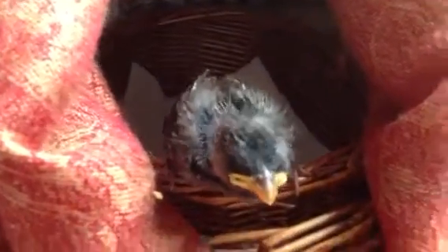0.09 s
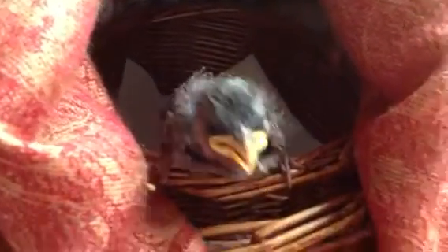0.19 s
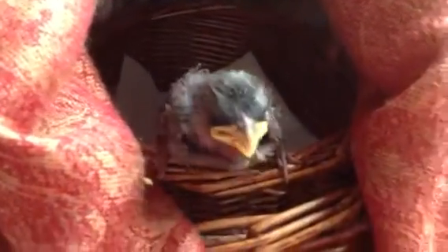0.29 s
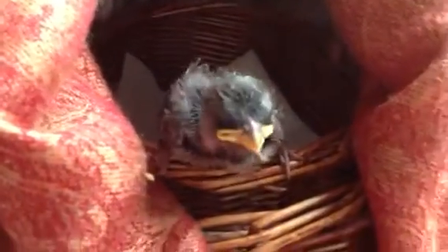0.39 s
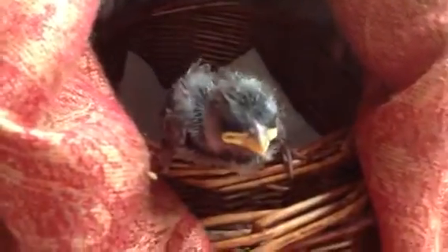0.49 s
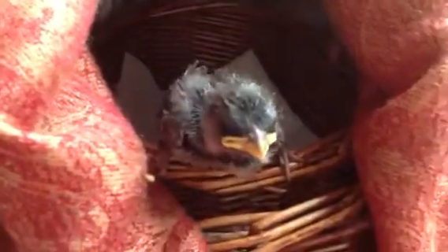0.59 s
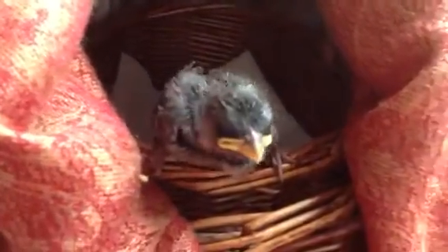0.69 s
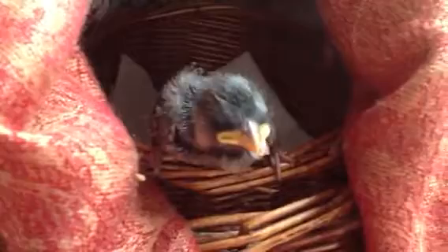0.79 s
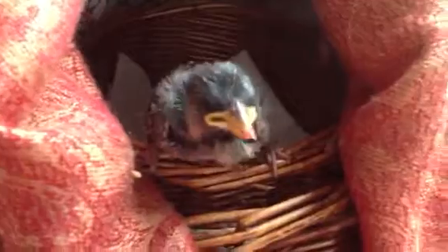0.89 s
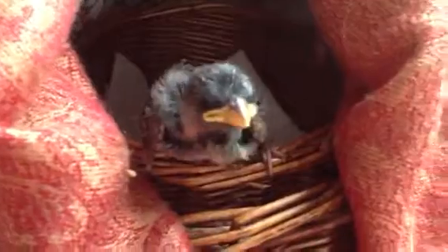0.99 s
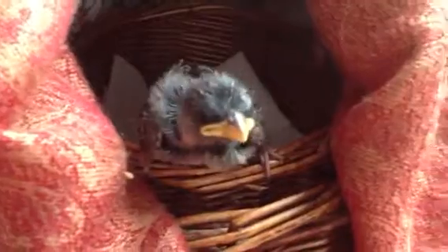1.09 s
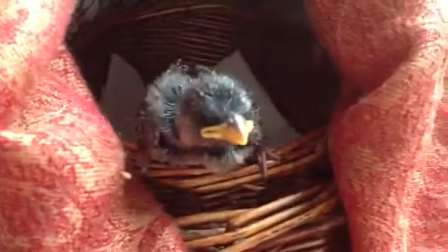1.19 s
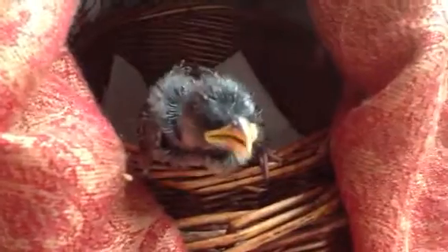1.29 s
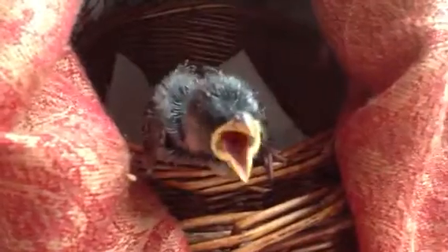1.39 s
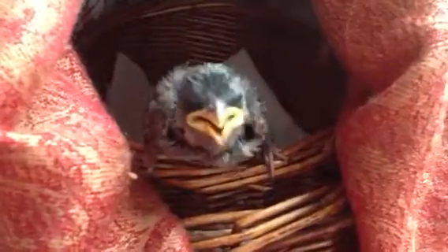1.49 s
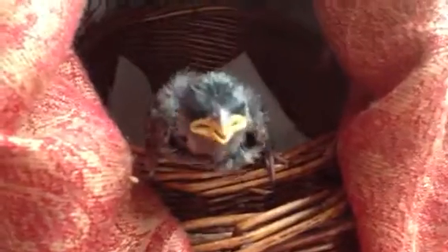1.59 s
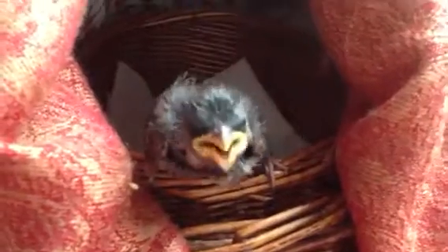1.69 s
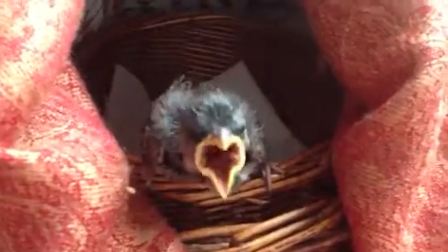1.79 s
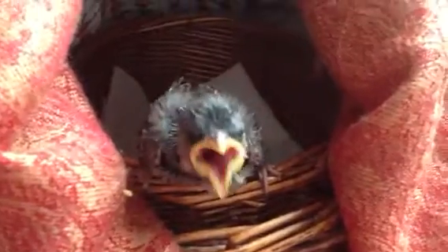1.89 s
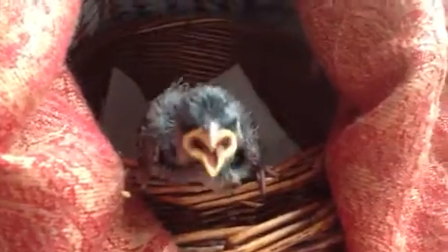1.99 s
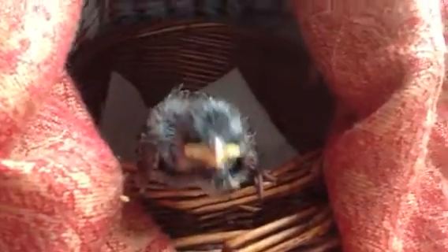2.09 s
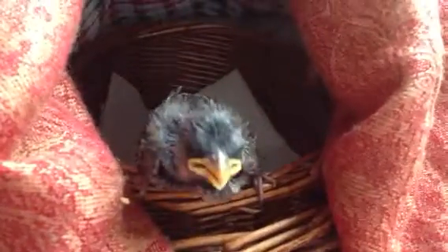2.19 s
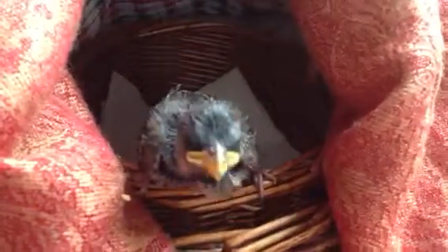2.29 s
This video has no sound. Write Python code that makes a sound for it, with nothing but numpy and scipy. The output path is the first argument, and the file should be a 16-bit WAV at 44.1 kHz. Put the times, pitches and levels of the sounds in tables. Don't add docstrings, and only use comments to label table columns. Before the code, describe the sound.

Two piercing double chirps from a baby bird, one near the start and one after a pause, raspy around clear whistles; tiny wicker ticks, very faint far birds and low room hush, recorded close indoors.

```python
import sys
import numpy as np
from scipy import signal
from scipy.fft import rfft, irfft
from scipy.io import wavfile
from scipy.ndimage import uniform_filter1d

SR = 44100
rng = np.random.default_rng(int(sys.argv[2]) if len(sys.argv) > 2 else 0)


def convert_level_to_amplitude(level_db):
    exponent = np.asarray(level_db, float) / 20
    return 10 ** exponent


def file_out(sig):
    cols = np.atleast_2d(sig).T
    lim = np.clip(cols, -1, 1)
    pcm = np.round(lim * 32767).astype(np.int16)
    wavfile.write(sys.argv[1], SR, pcm)


N = 101430


def rms_one(x):
    return x / np.sqrt(np.mean(x ** 2) + 1e-20)


def clock():
    return np.arange(N) / SR


def at_hz(points, hz):
    table_hz, table_db = np.transpose(points)
    return np.interp(np.log(hz), np.log(table_hz), table_db)


def drift(rate_hz):
    r = np.exp(-2 * np.pi * rate_hz / SR)
    noise = rng.standard_normal(N + SR)
    return rms_one(signal.lfilter([1], [1, -2 * r, r * r], noise)[SR:])


def window(start, end, edge_s=.002):
    t = clock()
    return np.clip(np.minimum(t - start, end - t) / edge_s, 0, 1)


def resonance(x, hz, width_hz):
    r = np.exp(-np.pi * width_hz / SR)
    gain = (1 - r * r) / 2
    return signal.lfilter([gain, 0, -gain], [1, -2 * r * np.cos(2 * np.pi * hz / SR), r * r], x)


def double_resonance(x, hz, width_hz):
    return resonance(resonance(x, hz, width_hz), hz, width_hz)


def moving_resonance(x, hz, width_hz):
    turn = np.exp(2j * np.pi * np.cumsum(hz) / SR)
    low_pass = signal.butter(1, width_hz / 2, fs=SR, output="sos")
    return 2 * np.real(turn * signal.sosfilt(low_pass, x / turn))


def glides(rows, wobble_db):
    out, t = np.zeros(N), clock()
    waver = 1 + .012 * drift(400)
    for s, length, start_hz, end_hz, db in rows:
        hz = np.interp(t, [s, s + length], [start_hz, end_hz]) * waver
        phase = 2 * np.pi * np.cumsum(hz) / SR
        tone = np.sin(phase) + convert_level_to_amplitude(-29.5) * np.sin(2 * phase)
        out += np.sqrt(2) * convert_level_to_amplitude(db) * window(s, s + length, length / 8) * tone
    return out * convert_level_to_amplitude(wobble_db * drift(120))


# [t/s, f/Hz, level/dB]
FIRST_ARCH = [
    (.223, 4000, -20),
    (.228, 4100, -11.5),
    (.2355, 4330, -8),
    (.2375, 4750, -14),
    (.244, 5250, -10.5),
    (.2515, 5420, -6.5),
    (.277, 4980, -8.5),
    (.280, 4560, -10.5),
    (.292, 3850, -13),
]
# [t/s, f/Hz, level/dB]
FIRST_RISE = [
    (.338, 2600, -42),
    (.348, 2950, -33),
    (.352, 3200, -22),
    (.362, 3600, -17),
    (.368, 3880, -11.5),
    (.379, 4450, -9),
    (.387, 4560, -11),
    (.392, 3950, -18),
    (.400, 3500, -24),
]
# [t/s, f/Hz, level/dB]
SECOND_ARCH = [
    (1.488, 3700, -30),
    (1.505, 4400, -21),
    (1.516, 5100, -13),
    (1.528, 5200, -7),
    (1.539, 5080, -8),
    (1.549, 5290, -8.5),
    (1.551, 4760, -7),
    (1.559, 4280, -9),
    (1.568, 3800, -22),
]
# [t/s, f/Hz, level/dB]
SECOND_RISE = [
    (1.618, 2700, -44),
    (1.632, 3300, -33),
    (1.6355, 3500, -20),
    (1.649, 4120, -12.5),
    (1.656, 4500, -12),
    (1.667, 4400, -11),
    (1.672, 3950, -17),
    (1.68, 3650, -20),
    (1.686, 3500, -34),
]
# [t/s, length/s]
VOICE_BREAKS = [
    (.2405, .001),
    (.278, .0015),
    (1.5412, .0015),
    (1.55, .002),
]
# [start t/s, end t/s, level/dB under the whistle]
HALF_PITCH_SPELLS = [
    (.238, .27, -32),
    (.376, .39, -34),
    (1.51, 1.551, -29),
    (1.652, 1.67, -36),
]
# [multiple of the whistle pitch, level/dB]
HALF_PITCH_PARTIALS = [(.5, -7.), (1.5, -3.), (2.5, -2.)]
# [start t/s, end t/s]
FLUTTER_SPELLS = [
    (.3805, .41),
    (1.6505, 1.69),
]
# [t/s, depth 0-1]
AIRWAY_PINCHES = [(.3816, .6), (.3851, .75), (.3883, .85), (.3906, .85), (.3922, .6), (.3947, .7),
                  (.3965, .7), (.3989, .7), (1.6534, .65), (1.656, .25), (1.658, .55), (1.661, .85),
                  (1.6643, .85), (1.6684, .7), (1.671, .6), (1.6745, .5), (1.6768, .95), (1.681, .95)]
# [f/Hz, level/dB]
SECOND_PARTIAL = [(5000, 12), (6000, 2), (7100, -12), (7700, -37), (8300, -33), (8800, -22), (9600, -34),
                  (10400, -23.5)]
# [f/Hz, level/dB]
THIRD_PARTIAL = [(8000, -30), (10000, -19), (12000, -23), (13000, -25), (13800, -27), (15000, -21),
                 (15400, -30), (16000, -50)]


def whistle():
    t, out, strength = clock(), np.zeros(N), np.zeros(N)
    shape = convert_level_to_amplitude(.5 * drift(180))
    half = sum(convert_level_to_amplitude(db) * window(a, b) for a, b, db in HALF_PITCH_SPELLS) * convert_level_to_amplitude(drift(160))
    for s, length in VOICE_BREAKS:
        shape = shape * np.tanh((s - t) / length * 2)
    pinch_s = .0007
    for s, depth in AIRWAY_PINCHES:
        shape = shape * (1 - depth * np.exp(-.5 * ((t - s) / pinch_s) ** 2))
    dull = convert_level_to_amplitude(-3 * sum(window(a, b) for a, b in FLUTTER_SPELLS))
    second = dull * convert_level_to_amplitude(1.5 * drift(100))
    third = dull * convert_level_to_amplitude(1.5 * drift(100))
    for note in (FIRST_ARCH, FIRST_RISE, SECOND_ARCH, SECOND_RISE):
        s, hz, db = np.transpose(note)
        hz = np.interp(t, s, hz) * (1 + .005 * drift(400))
        level = convert_level_to_amplitude(np.interp(t, s, db)) * window(s[0], s[-1])
        phase = 2 * np.pi * np.cumsum(hz) / SR
        tone = np.sin(phase)
        tone += second * convert_level_to_amplitude(at_hz(SECOND_PARTIAL, 2 * hz)) * np.sin(2 * phase)
        tone += third * convert_level_to_amplitude(at_hz(THIRD_PARTIAL, 3 * hz)) * np.sin(3 * phase)
        for multiple, partial_db in HALF_PITCH_PARTIALS:
            tone += half * convert_level_to_amplitude(partial_db) * np.sin(multiple * phase)
        out += np.sqrt(2) * level * shape * tone
        strength += level * dull
    return out, strength


# [t/s, level/dB, throat f/Hz, windpipe level/dB, beak level/dB]
FIRST_RASP = [
    (0.155, -60.5, 5750, 1.5, -1.5),
    (0.177, -26, 6200, -4.5, -9.5),
    (0.201, -22.5, 6175, 2, -19.5),
    (0.231, -17, 5910, -8.5, 10.5),
    (0.291, -19, 5530, -1, 0.5),
    (0.324, -22, 4920, -1, -11.5),
    (.35, -28.5, 5400, 4.5, 3.5),
    (.395, -22.5, 4800, 1, -4),
    (0.435, -63.5, 4320, 19, 4),
]
# [t/s, level/dB, throat f/Hz, windpipe level/dB, beak level/dB]
SECOND_RASP = [
    (1.437, -51.5, 6750, -21, 10.5),
    (1.455, -34.5, 8300, -7, 2.5),
    (1.484, -18, 7450, -7, 2.5),
    (1.511, -18, 7100, -20, 6.5),
    (1.565, -22, 5270, 0, 1.5),
    (1.6, -28.5, 4900, 0.5, -9),
    (1.63, -26, 5393, 5.5, 0.5),
    (1.68, -30, 4470, 4.5, -1),
    (1.713, -51.5, 4480, 5, -10),
]
# [f/Hz, width/Hz, level/dB]
WINDPIPE = [(1450, 700, -30), (2900, 700, -14), (3900, 1100, -4), (4900, 1200, -5)]
# [f/Hz, width/Hz, level/dB]
BEAK_HOLLOWS = [(8300, 1200, -21), (11800, 7500, -16.5), (14090, 2000, -23.5)]


def rasp(strength):
    t = clock()
    flaps_per_s, throat_width_hz = 5000, 620
    flaps = (rng.random(N) < flaps_per_s / SR) * convert_level_to_amplitude(2 * rng.standard_normal(N))
    flaps = rms_one(flaps * rng.choice([-1, 1], N))
    flaps = flaps + 1.3 * rng.standard_normal(N)
    flaps = flaps * convert_level_to_amplitude(1.3 * drift(450))
    s, *columns = np.transpose(np.vstack([FIRST_RASP, SECOND_RASP]))
    db, hz, pipe_db, beak_db = (np.interp(t, s, c) for c in columns)
    hz = hz * (1 + .035 * drift(150))
    throat = moving_resonance(flaps, hz, throat_width_hz)
    throat = moving_resonance(throat, hz, 2 * throat_width_hz)
    pipe, beak = np.zeros(N), np.zeros(N)
    for k, (f, width, d) in enumerate(WINDPIPE, start=1):
        pipe += convert_level_to_amplitude(d) * double_resonance(np.roll(flaps, k * SR // 100), f, width)
    for k, (f, width, d) in enumerate(BEAK_HOLLOWS):
        beak += convert_level_to_amplitude(d) * resonance(np.roll(flaps, -k * SR // 100), f, width)
    voiced = sum(window(call[0][0], call[-1][0]) for call in (FIRST_RASP, SECOND_RASP))
    lock_at_db, lock_db = -10, -32
    lock = uniform_filter1d(strength ** 2 / (strength ** 2 + convert_level_to_amplitude(2 * lock_at_db)), size=90)
    sound = (throat + convert_level_to_amplitude(pipe_db) * pipe + convert_level_to_amplitude(beak_db) * beak) / np.std(throat)
    sound = voiced * convert_level_to_amplitude(db + lock_db * lock) * sound
    sound = sound - .4 * resonance(sound, 1960, 900)
    return signal.sosfilt(signal.butter(2, 650, "high", fs=SR, output="sos"), sound)


# [start t/s, end t/s, start f/Hz, end f/Hz, level/dB]
BREATH_BANDS = [(.165, 0.2, 1349, 1670, -55.5), (.185, 0.22, 12500, 14000, -34.5),
                (.2, .222, 5600, 7665, -36), (.29, .36, 1500, 900, -56.5), (.385, 0.426, 2900, 2700, -34),
                (.29, 0.32, 4900, 3900, -27.5), (.176, 0.26, 7700, 6500, -29),
                (1.45, 1.455, 1400, 1400, -56), (1.478, 1.52, 10500, 6500, -37.5),
                (1.56, 1.629, 2600, 2500, -42), (1.655, 1.702, 2400, 2600, -42.5),
                (1.6, 1.632, 4637.5, 6500, -39), (1.436, 1.446, 11600, 12600, -59)]


def side_bands():
    out, t, width_hz = np.zeros(N), clock(), 770
    for a, b, start_hz, end_hz, db in BREATH_BANDS:
        hz = np.interp(t, [a, b], [start_hz, end_hz])
        band = moving_resonance(rng.standard_normal(N), hz, width_hz)
        band = moving_resonance(band, hz, width_hz)
        out += convert_level_to_amplitude(db) * window(a, b, (b - a) / 4) * rms_one(band)
    return out


# [t/s, length/s, start f/Hz, end f/Hz, level/dB]
OPENING_PEEPS = [
    (.151, .013, 5750, 6200, -38),
    (1.4345, .005, 5200, 6100, -52),
    (1.438, .016, 6050, 6500, -50),
]


def peeps():
    return glides(OPENING_PEEPS, wobble_db=2.5)


def room(x):
    t = np.arange(SR // 2) / SR
    white = rng.standard_normal((3, len(t)))
    tail = convert_level_to_amplitude(-60 * t / .27) * double_resonance(white[0], 4200, 1150)
    tail += convert_level_to_amplitude(-2 - 60 * t / .4) * double_resonance(white[1], 3024, 900)
    tail += convert_level_to_amplitude(-24 - 60 * t / .45) * white[2]
    tail *= np.clip((t - .004) / .0065, 0, 1)
    return convert_level_to_amplitude(-27) * signal.fftconvolve(x, tail / np.linalg.norm(tail))[:N]


# [t/s, peak level/dB, f/Hz, ring/s]
TICK_EVENTS = [(.25, -58, 45, .05), (.25, -52, 85, .04), (.251, -53, 750, .02), (1.525, -68, 40, .08),
               (1.405, -47, 8000, .002), (1.405, -51, 5800, .002), (1.43, -46, 8500, .002),
               (1.946, -53, 700, .02), (1.961, -50, 1050, .02), (1.961, -51, 600, .02),
               (1.822, -50, 7500, .002), (1.1, -60, 480, .06)]


def ticks():
    out, t = np.zeros(N), clock()
    for s, db, hz, ring_s in TICK_EVENTS:
        since = t - s
        fade = convert_level_to_amplitude(db - 60 * np.clip(since, 0, 1) / ring_s)
        out += fade * np.clip(since * 900, 0, 1) * np.sin(2 * np.pi * hz * since)
    return out


# [t/s, length/s, start f/Hz, end f/Hz, level/dB]
FAR_NOTES = [(.62, .085, 1900, 1900, -76), (.72, .1, 1900, 1900, -76), (.855, .07, 1930, 2000, -74),
             (1.266, .025, 3700, 3650, -72), (1.292, .024, 3500, 3450, -70), (1.312, .02, 3000, 2950, -71),
             (1.318, .04, 3700, 3600, -76), (1.332, .035, 2950, 2800, -71), (1.36, .045, 2800, 2750, -78),
             (1.84, .03, 6300, 6600, -76), (1.91, .04, 6500, 6400, -77), (1.948, .014, 3400, 4200, -73),
             (1.955, .008, 4600, 4900, -70), (1.959, .014, 6100, 6800, -61), (1.972, .09, 6700, 6500, -76),
             (2.015, .035, 5150, 5000, -76), (2.095, .025, 4750, 5100, -73), (2.103, .02, 6200, 6200, -71),
             (2.125, .04, 6300, 6150, -76), (2.15, .035, 3750, 3800, -76), (2.192, .022, 5200, 5200, -64),
             (2.22, .028, 5200, 5150, -70)]


def far_birds():
    return convert_level_to_amplitude(-4) * glides(FAR_NOTES, wobble_db=4)


# [f/Hz, level/dB]
HUSH_COLOUR = [(18, -61.5), (30, -40.5), (164, -1), (728, -12), (1970, -14.5), (2130, -14.5), (5170, -16.5),
               (5590, -16.5), (15500, -17)]
# [t/s, level/dB]
HISS_LEVEL = [
    (0, -1),
    (.15, -3.5),
    (.45, 4.5),
    (.7, 0.5),
    (.85, -2.5),
    (1.4, 0.5),
    (1.75, 0.5),
    (1.9, -2.5),
    (2.3, -2),
]


def hush():
    hz = np.maximum(np.arange(N // 2 + 1) * SR / N, 1)
    noise = irfft(rfft(rng.standard_normal(N)) * convert_level_to_amplitude(at_hz(HUSH_COLOUR, hz)), N)
    noise = convert_level_to_amplitude(-64.5) * rms_one(noise)
    treble = irfft(rfft(noise) * np.clip(hz / 5000 - 1, 0, 1), N)
    swell = convert_level_to_amplitude(np.interp(clock(), *np.transpose(HISS_LEVEL)))
    return noise + treble * (swell - 1)


def scene():
    tone, strength = whistle()
    hoarse = rasp(strength) + peeps() + side_bands()
    far = far_birds()
    scattered = convert_level_to_amplitude(-3) * drift(70) * tone
    wet = room(scattered + hoarse + convert_level_to_amplitude(21) * far)
    return (tone + hoarse + far + wet + ticks() + hush())[None]


def top_cut(x):
    return signal.sosfilt(signal.butter(12, 15700, fs=SR, output="sos"), x)


def record(dry):
    overload = .78
    rounded = dry / (1 + (dry / overload) ** 6) ** (1 / 6)
    low_pass = signal.ellip(12, .2, 60, 15250, fs=SR, output="sos")
    return top_cut(signal.sosfilt(low_pass, rounded))


dry = scene()
out = record(dry)
file_out(out)
```